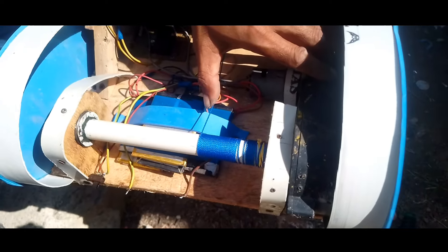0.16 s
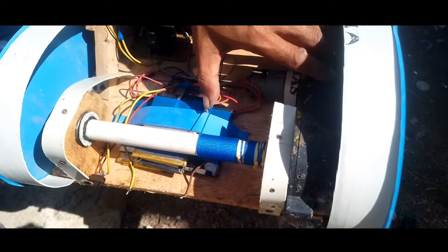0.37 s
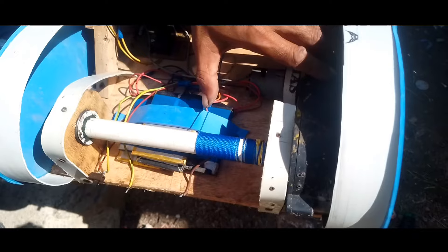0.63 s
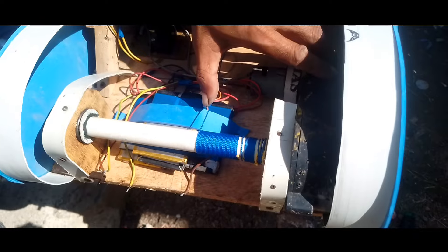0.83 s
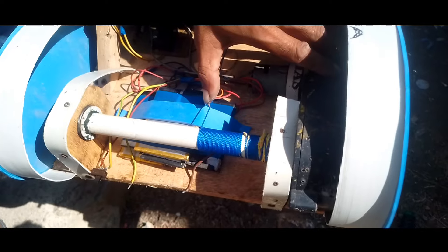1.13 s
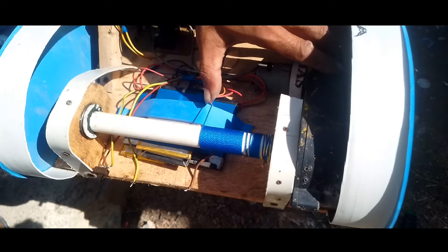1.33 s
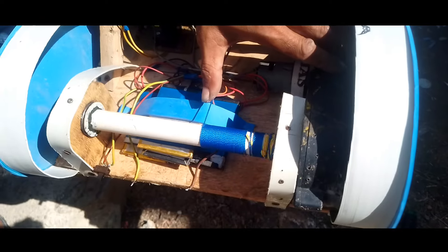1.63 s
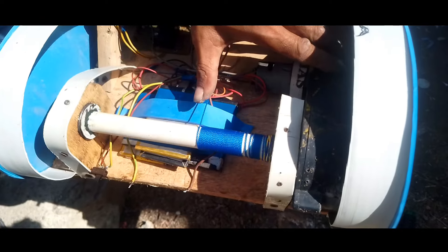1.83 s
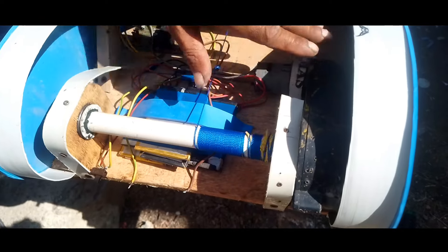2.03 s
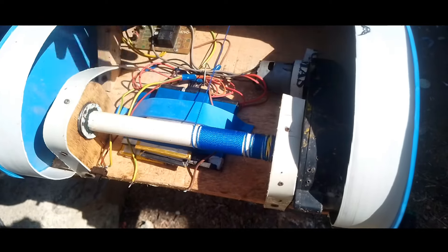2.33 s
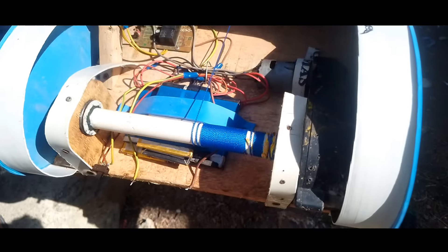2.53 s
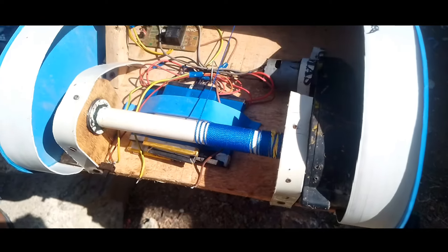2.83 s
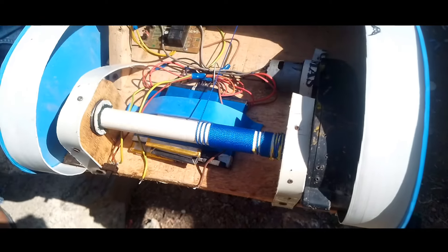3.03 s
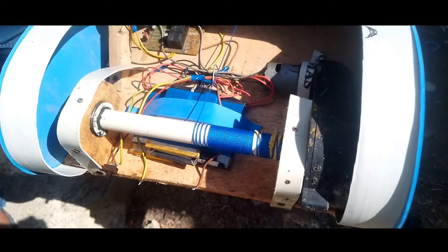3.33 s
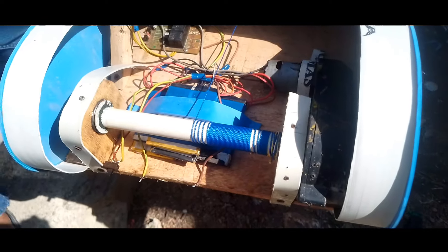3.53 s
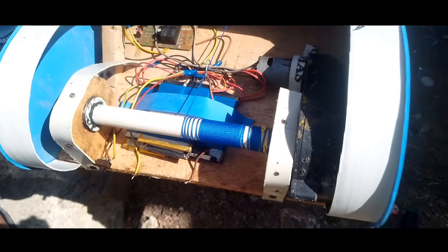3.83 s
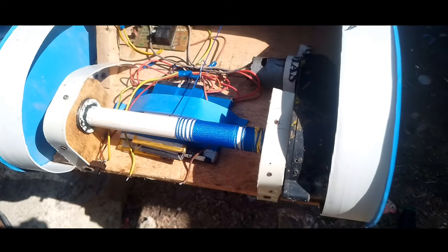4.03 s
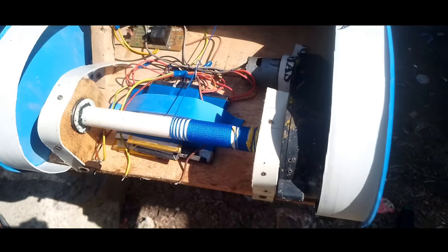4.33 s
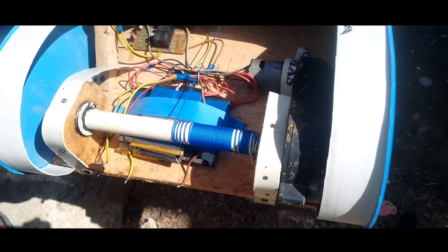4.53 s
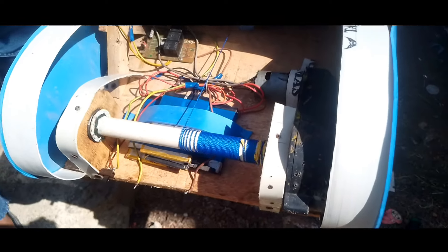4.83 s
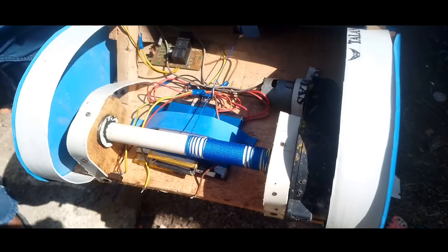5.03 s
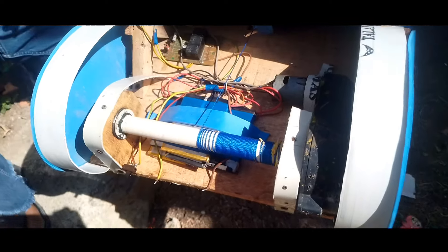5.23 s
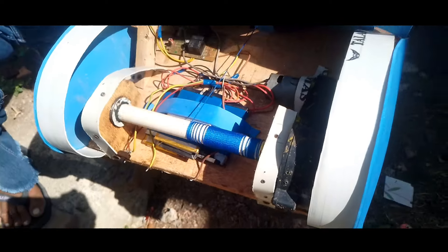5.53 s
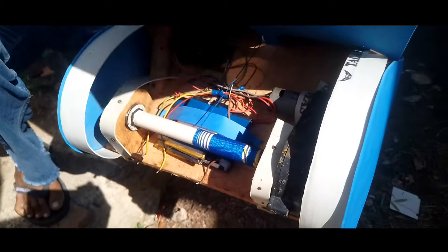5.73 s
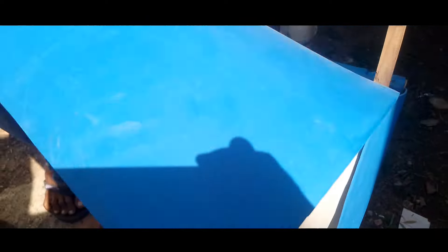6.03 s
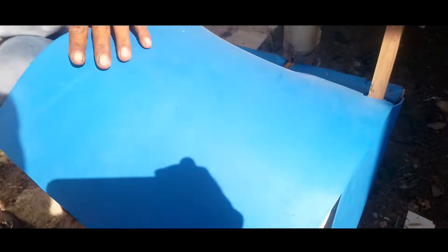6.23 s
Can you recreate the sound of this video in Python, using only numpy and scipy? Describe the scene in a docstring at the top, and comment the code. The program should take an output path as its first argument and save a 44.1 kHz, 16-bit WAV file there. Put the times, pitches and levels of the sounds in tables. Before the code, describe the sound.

From 0 to 3.7 seconds a small brushed gear motor runs very near the stereo microphones in a quiet yard: a steady, nasal electric whine over dry, gritty chatter of gears and brushes, with fine uneven ticks, low rumble and a gentle sway from the turning spool. Around 2 seconds its treble softens as a hand moves away. At 3.7 the current is cut; pitch and rattle slide down to rest within about a quarter second. A hushed pause follows, with very faint brief tones. At 4.19 a tiny bright switch click, stronger on the right, starts it again; the whine climbs rapidly, then eases to full speed by about 5.3, slightly farther away. Near 5.75 a lid swinging over briefly brightens the treble and dulls the hum, then muffles it. At 5.96 the motor is cut and runs down, leaving faint yard noise and a weak, wavering distant buzz until 6.38.

```python
"""A small brushed gear motor winds a spool on a wooden frame outdoors, coasts to a stop, is switched on
and cut again. Rotor and gear mesh sing as sines; chatter of teeth and brushes rings casing modes; teeth tick.
Two microphones hear it differently: a hand shades the motor at first, then they stand further off,
and late on a lid swings down over the motor. Behind it lie a yard of shaped noise, brief faint tones
in the pause, and a far buzz of sines that sets in near the end and remains when the motor rests."""
import sys
import numpy as np
from scipy import signal
from scipy.fft import rfft, irfft
from scipy.io import wavfile

SR = 44100
rng = np.random.default_rng(int(sys.argv[2]) if len(sys.argv) > 2 else 0)


def unload_wav(signal):
    """Save mono or channel-first audio to the path in sys.argv[1] as 16-bit WAV at rate SR, clipped to [-1, 1]."""
    wavfile.write(
        sys.argv[1],
        SR,
        np.round(np.clip(np.atleast_2d(signal).T, -1, 1) * 32767).astype(np.int16),
    )


N = 281358
TIME = np.arange(N) / SR
GEAR = 13 / 70  # turns of the ten-tooth gear per rotor turn


def amp(db):
    """Decibels to gain."""
    return 10 ** (np.asarray(db) / 20)


def rms_one(x):
    """Scale so that the mean of the channels has rms 1."""
    return x / np.sqrt(np.mean(np.atleast_2d(x).mean(axis=0) ** 2) + 1e-20)


def in_time(rows, t=TIME):
    """Columns of a curve table, joined by straight lines over its first column."""
    at, *columns = np.transpose(rows)
    return [np.interp(t, at, column) for column in columns]


def drift(rate_hz, step=8):
    """Slow chance of spread 1: noise twice through a one-pole low-pass."""
    r = np.exp(-2 * np.pi * rate_hz * step / SR)
    noise = rng.standard_normal(N // 8 + 3002)
    slow = signal.lfilter([1], [1, -2 * r, r * r], noise)[3000:]  # skip the filter's start
    return np.interp(np.arange(N) / 8, np.arange(len(slow)), rms_one(slow))


def bump(middle_s, length_s):
    """A soft rise and fall of height 1."""
    return np.exp(-(2 * (TIME - middle_s) / length_s) ** 2)


def resonance(hz, width_hz):
    """One second-order section with gain 1 on top."""
    r = np.exp(-np.pi * width_hz / SR)
    return [(1 - r * r) / 2, 0, (r * r - 1) / 2, 1, -2 * r * np.cos(2 * np.pi * hz / SR), r * r]


def shaped_noise(spectrum, alike):
    """Stereo noise with a given spectrum and left-right likeness; rms 1."""
    hz = np.maximum(np.fft.rfftfreq(N, 1 / SR), 1)
    table_hz, table_db = np.transpose(spectrum)
    gain = amp(np.interp(np.log(hz), np.log(table_hz), table_db))
    mid, side = irfft(rfft(rng.standard_normal((2, N))) * gain, N)
    alike = np.clip(alike, 0, 1)
    return rms_one(np.sqrt(1 + alike) * mid + np.sqrt(1 - alike) * side * np.array([[1], [-1]]))


def tone(hz, db):
    """A steady sine at rms level db, slightly shifted in phase between the microphones."""
    phase = rng.uniform(0, 2 * np.pi) + rng.normal(0, .6, (2, 1))
    return np.sqrt(2) * amp(db) * np.sin(2 * np.pi * hz * TIME + phase)


# the yard all round the microphones: (time [s], level [dB])
YARD_LEVEL = [(0, -65.5), (3.95, -73), (4.02, -69), (4.09, -65), (4.15, -69), (4.3, -67), (6.38, -68)]
# colour of the yard: (frequency [Hz], relative density [dB per Hz])
YARD_SPECTRUM = [(35, -43.5), (60, -13), (159, -15.5), (270, -7.5), (464, -5), (792, -12), (931, -14),
                 (1670, -9), (2150, -3.5), (2980, -13.5), (3760, -9), (5980, -14.5), (6870, 0.5),
                 (12600, -27), (13800, -14.5), (15500, -37.5)]


def yard():
    """Open-air noise from many directions, so the two microphones share little of it."""
    return amp(in_time(YARD_LEVEL)[0] + 1.5 * drift(12)) * shaped_noise(YARD_SPECTRUM, 0.25)


BUZZ_START_S, BUZZ_RISE_S = 6.0, 0.024
# far buzz, partials about 250 Hz apart: (frequency [Hz], level before swells and waver [dB])
BUZZ_PARTIALS = [(748, -86), (995, -78), (1248, -73), (1506, -66.5), (1738, -71.5), (2288, -87),
                 (2495, -73), (3300, -82), (3833, -88), (4081, -81), (4310, -81), (4565, -89), (4791, -89),
                 (5060, -89), (5297, -90), (6304, -86), (6551, -83), (7058, -82), (7300, -69), (7569, -80),
                 (8306, -77), (10094, -78.5)]
# single partials swell: (middle [s], length [s], partial [Hz], gain [dB])
BUZZ_SWELLS = [(6.135, 0.064, 1248, 14), (6.235, .06, 1248, 7), (6.215, 0.08, 1506, 17.5),
               (6.375, 0.063, 1738, 9), (6.035, 0.078, 1738, 32), (6.335, 0.047, 2495, 0),
               (6.205, 0.13, 7300, 20)]


def far_buzz(waver_db=4.5):
    """A buzz from far off: a row of sines that waver and swell one by one."""
    partials = 0
    for hz, db in BUZZ_PARTIALS:
        swell_db = sum(gain_db * bump(middle_s, length_s)
                       for middle_s, length_s, partial_hz, gain_db in BUZZ_SWELLS
                       if abs(partial_hz - hz) < 120)
        partials = partials + tone(hz, db + swell_db + waver_db * drift(26))
    return partials * np.clip((TIME - BUZZ_START_S) / BUZZ_RISE_S, 0, 1)


# faint brief tones in the pause: (middle [s], length [s], frequency [Hz], level at the middle [dB])
BRIEF_TONES = [(3.92, .08, 6200, -72.5), (3.94, .07, 3415, -76.5), (3.94, .08, 8192, -78.5),
               (4.0, .11, 2168, -76), (4.107, .06, 2410, -74), (4.12, 0.09, 1860, -73),
               (4.12, .08, 2164, -76), (4.13, .06, 7665, -75)]


def pause_tones():
    """Faint sines that rise and fall softly while the motor rests or nearly so."""
    return sum(tone(hz, db) * bump(middle_s, length_s) for middle_s, length_s, hz, db in BRIEF_TONES)


# contact snaps shut and bounces: (time [s], relative strength [dB])
CONTACTS = [(4.1911, -10.5), (4.1947, -26), (4.2032, -38)]
# ringing of the switch: (frequency [Hz], relative level [dB], time to fall by 60 dB [s])
CONTACT_MODES = [(4470, -24.5, 0.012), (6500, -20, 0.012), (9900, -8, 0.011), (10440, -11, .01),
                 (14700, -16, .008)]


def switch():
    """The contact snaps shut and bounces; so small a part sends out no bass."""
    clicks, out = np.full(N, 1e-18), 0
    for s, db in CONTACTS:
        clicks[round(s * SR)] = amp(db)
    for hz, db, t60_s in CONTACT_MODES:
        r, w = amp(-60 / (t60_s * SR)), 2 * np.pi * hz / SR
        # a wide resonance softens the onset, then the mode rings
        rising = signal.sosfilt([resonance(hz, 1500)], clicks) * SR / (np.pi * 1500)
        ringing = signal.lfilter([0, np.sin(w)], [1, -2 * r * np.cos(w), r * r], rising)
        out = out + amp(db) * ringing / 8
    return out * amp([[-2.5], [2.5]])  # stronger at the right microphone


# low rumble: (frequency [Hz], relative density [dB per Hz])
RUMBLE_SPECTRUM = [(12, -50), (20, -23), (49, -34.5), (108, -12.5), (150, -20), (260, 2.5), (340, -31.5),
                   (570, -120)]
RUMBLE_DB = -64  # at top speed


def rumble(speed):
    """Low noise, nearly alike at both microphones, in proportion to rotor speed."""
    level = amp(RUMBLE_DB) * speed / max(speed) * amp(3.0 * drift(4))
    return level * shaped_noise(RUMBLE_SPECTRUM, .93)


TICK_SHAFT = .03703  # turns of the next gear per rotor turn
TICK_SCATTER_DB, TICK_FAR_DB = 2.5, -4.5  # chance spread; change with microphones further off
# teeth that tick: (share of the turn [0-1], relative strength [dB])
TICKING_TEETH = [(.17, -13), (.38, -17), (.575, -20), (.775, -20), (.975, -21)]
# ringing of a tick: (frequency [Hz], width of one section [Hz], left level [dB], right level [dB])
TICK_RINGING = [(3660, 700, -8.5, -12), (6870, 870, -1, -25), (8440, 590, -6, -20), (10400, 1200, -11, -3)]


def ticks(speed, rotor, view):
    """Short uneven ticks, once per tooth and turn, weaker at low speed and further off."""
    clicks = np.full(N, 1e-18)
    for share, db in TICKING_TEETH:
        turns = rotor * TICK_SHAFT / (2 * np.pi) - share
        at = np.flatnonzero(np.diff(np.floor(turns)))
        clicks[at] = amp(db + TICK_SCATTER_DB * rng.standard_normal(100)[:len(at)])
    clicks = clicks * (speed / max(speed)) ** 3.0 * amp(TICK_FAR_DB * np.clip(view - 1, 0, 1))
    out = 0
    for hz, width_hz, left_db, right_db in TICK_RINGING:
        peak_one = np.e * SR / (2 * np.pi * width_hz)  # a unit click rings up to about 1
        ringing = signal.sosfilt([resonance(hz, width_hz)] * 2, clicks) * peak_one
        out = out + amp([[left_db], [right_db]]) * ringing
    return out


# casing and frame modes: (frequency [Hz], width of one section [Hz], then relative left and right
# level [dB] in each of the three views, left-right likeness [0-1], right lag [ms])
CASING_MODES = [(282, 91, -30, -30, -28.5, -26, -29, -29.5, 0.99, 0.046),
                (344.6, 108, -27, -26, -22, -22.5, -23.5, -26, 1, -0.1),
                (467, 68, -24.5, -27, -13, -15.5, -15, -14.5, 1, 0.03),
                (528.3, 193, -11, -11, -11.5, -10, -11.5, -9, 0.99, -0.051),
                (624, 88, -15, -16, -12.5, -13, -11, -11.5, 1, -0.34),
                (861, 140, -10, -15.5, -8, -13, -8.5, -10.5, 0.9, -0.038),
                (957, 82, -19, -14.5, -23.5, -17.5, -13.5, -20.5, 0.94, 0.028),
                (1087, 150, -23, -28, -22, -30.5, -24.5, -27, 0.9, 0),
                (1242, 177, -12.5, -17.5, -10.5, -14, -9.5, -13.5, 0.73, -0.11),
                (1433, 290, -24.5, -23.5, -23, -22.5, -21.5, -20, 0.4, 0.2),
                (1614, 310, -18, -18, -16.5, -17.5, -16, -16, 0.38, 0.1),
                (2044, 310, -19.5, -16, -22, -14, -18, -11, 0.31, 0.039),
                (2390, 240, -23, -19.5, -30.5, -17, -20, -15.5, 0.22, 0.00044),
                (2950, 435, -11.5, -13.5, -10.5, -14, -10, -12.5, 0.67, 0.13),
                (3348, 320, -16.5, -22.5, -19.5, -24.5, -12.5, -27.5, 0.32, 0.08),
                (3680, 510, -19.5, -22, -14, -16.5, -16.5, -14, 0.97, 0.0029),
                (3996, 430, -14, -17.5, -15, -16.5, -16.5, -22, 0.23, 0.016),
                (4435, 590, -18.5, -45, -18.5, -45.5, -17, -22, 0.18, 0.045),
                (5090, 560, -19, -36.5, -18.5, -31, -18, -48, 0.21, 0.016),
                (5570, 600, -16, -31.5, -17, -50, -15.5, -36, 0.11, -0.067),
                (6237, 470, -16, -22.5, -14.5, -24, -13, -21, 0.34, -0.067),
                (7020, 830, -14.5, -48.5, -12.5, -50, -14.5, -31, 0.09, -0.013),
                (7990, 790, -12, -30, -12.5, -30.5, -11, -21.5, 0.22, -0.16),
                (8500, 360, -21, -15, -23, -25, -14.5, -21.5, 0.41, -0.012),
                (9385, 590, -18, -11, -14, -10, -11.5, -6, 0.43, 0.055),
                (9994, 510, -16.5, -4.5, -17.5, -5.5, -12.5, -5.5, 0.21, -0.016),
                (10530, 570, -27, -10, -27.5, -4.5, -25, -6, 0.27, 0.14),
                (10820, 400, -25, -30, -23.5, -30, -18.5, -29, 0.1, 0),
                (11160, 940, -34.5, -23, -42.5, -16, -27, -15, 0.16, 0.077),
                (12300, 840, -23, -22.5, -21.5, -20, -17, -17.5, 0.21, 0.035),
                (13200, 750, -27.5, -37, -21.5, -32, -27, -26, 0.18, -0.035),
                (14060, 500, -28, -55, -23.5, -56.5, -22, -50, 0.02, 0.013),
                (14700, 700, -27.5, -55, -22, -55, -19.5, -39, 0.02, 0.013),
                (15500, 910, -21.5, -48.5, -18.5, -47.5, -19, -28, 0.04, -0.03)]
# borders between hum, casing and treble: [Hz]
GROUP_BORDERS = [1500, 8800]
WORN = .4  # weight of the chatter that repeats with every turn of the gear
LUMP_HZ = 304  # rate at which the chatter clumps


def view_db(mode, view):
    """Left and right level of a mode as the view changes."""
    return np.array([np.interp(view, [0, 1, 2], mode[2 + side:8:2]) for side in (0, 1)])


def rattle(rotor, view, rotor_db=1.5, lumps_db=2.0, patchy_db=1.0):
    """Brush and tooth chatter, throbbing with rotor and gear, rings every mode; one sum per group."""
    gear = rotor * GEAR
    throb_db = rotor_db * np.cos(rotor) + 0.52 * np.cos(rotor * .036)  # rotor and slow output shaft
    throb_db = throb_db + .4 * np.cos(gear) + .8 * np.cos(2 * gear) + .8 * np.cos(3 * gear)
    spot = (gear / (2 * np.pi) % 1 * 700).astype(int)  # worn spots round the gear knock on every turn
    chatter = []
    for _ in range(4):
        level = amp(throb_db + lumps_db * drift(LUMP_HZ))
        repeating = rng.standard_normal((2, 700))[:, spot]
        loose = rng.standard_normal((2, N))
        chatter.append(level * (WORN * repeating + np.sqrt(1 - WORN ** 2) * loose))
    patches = [drift(13.0) for _ in range(6)]
    groups = np.zeros((3, 2, N))
    for k, mode in enumerate(CASING_MODES):
        hz, width_hz, alike, lag_ms = mode[0], mode[1], np.clip(mode[8], 0, 1), mode[9]
        source = rms_one(chatter[k % 4]) / np.sqrt(2)
        left, own = signal.sosfilt([resonance(hz, width_hz)] * 2, source)
        late = np.interp(TIME - lag_ms / 1000, TIME, left)
        pair = [left, alike * late + np.sqrt(1 - alike ** 2) * own]
        level = amp(view_db(mode, view) + patchy_db * patches[k % 6])
        groups[np.searchsorted(GROUP_BORDERS, hz)] += level * pair
    return groups


# sung lines: (rotor multiple, gear multiple, relative left and right level before the casing [dB],
# right lag [rad])
SUNG_ORDERS = [(1, 0, -24, -20, 0.12), (0, 10, -13, -16.5, 0.5), (0, 9, -33, -32, 1),
               (-1, 10, -40, -35, 1.5), (2, 0, -44, -25.5, -0.5), (0, 15, -41.5, -42, 0.5),
               (3, 0, -26.5, -30.5, -0.5), (0, 30, -47, -46, -2.5), (0, 20, -35.5, -22, 4.5),
               (5, 0, -39.5, -26.5, -0.3), (6, 0, -24.5, -20, 1.5), (9, 0, -28, -26, -0.5),
               (10, 0, -19, -24.5, 1.5), (11, 0, -26, -28.5, -2), (10, 10, -27.5, -30, -1),
               (12, 0, -19.5, -20, -1), (11, 10, -33, -41, 3), (15, 0, -16, -15.5, -0.3),
               (16, 0, -33.5, -36.5, 3.5), (18, 0, -27, -33, -5), (19, -1, -26, -33.5, -2),
               (20, 0, -35.5, -33.5, 3.1), (21, 0, -26.5, -39, 6), (24, 0, -35.5, -36, 2.5),
               (30, -1, -36, -27.5, 5.5), (30, 0, -41, -33, -1), (31, 0, -34, -29, -2),
               (31, 1, -36, -31, 0.2), (34, 0, -42, -31, 6.5)]
# some brush lines change once the microphones are further off: {rotor multiple: change [dB]}
FAR_LINES = {11: -1, 12: -1, 15: -4, 16: 5, 18: 8, 21: 6}
BLUR_DB = 24  # loss of the rotor tone and high brush lines at standstill


def whine(speed, rotor, view, first_db, second_db, mesh_waver_db=.8, brush_waver_db=1.88):
    """Each order is a sine on the exact speed; it swells as it glides through the casing modes."""
    groups, coarse = np.zeros((3, 2, N)), np.arange(0, N, 256)
    powers = [amp(2 * view_db(mode, view[coarse])) for mode in CASING_MODES]
    wavers = [drift(18.4)[coarse] for _ in range(8)]
    for k, (turns, gear_turns, left_db, right_db, lag) in enumerate(SUNG_ORDERS):
        multiple = round(turns) + round(gear_turns) * GEAR
        hz = np.maximum(multiple * speed[coarse], 1)
        power = sum(p / (1 + ((hz - mode[0] ** 2 / hz) / mode[1]) ** 2) ** 2
                    for p, mode in zip(powers, CASING_MODES))
        waver_db = brush_waver_db if round(turns) else mesh_waver_db
        db = waver_db * wavers[k % 8] + np.array([[left_db], [right_db]])
        if round(gear_turns) in (15, 30):  # second mesh
            db = db + second_db[coarse]
        elif round(turns) == 0:  # first mesh
            db = db + first_db[coarse]
        elif round(turns) >= 9 or multiple == 1:
            # the rotor tone and the high brush lines only stand clear near full speed
            db = db - BLUR_DB * (1 - speed[coarse] / max(speed))
            db = db + FAR_LINES.get(round(turns), 0) * np.clip(view[coarse] - 1, 0, 1)
        gains = np.sqrt(2 * power) * amp(db)
        level = np.array([np.interp(np.arange(N), coarse, gain) for gain in gains])
        line = np.sin(multiple * rotor + rng.uniform(0, 2 * np.pi) - np.array([[0], [lag]]))
        groups[np.searchsorted(GROUP_BORDERS, multiple * max(speed))] += level * line
    return groups


# speed in each of the three views, before the spool rocks it: [rotor turns per s]
VIEW_SPEEDS = [334, 339.4, 339.6]
# gathering speed: (time after switching on [s], share of full speed [0-1])
RUN_UP = [(0, 0), (.06, .454), (.11, .607), (.17, .725), (.22, .785), (.28, .822), (.41, .857), (.49, .892),
          (.57, .913), (.65, .934), (.81, .966), (.97, .988), (1.05, .995), (1.15, 1)]
# current cut, the switch closes again in between: (time [s], time constant of coasting [s])
CURRENT_CUTS = [(3.702, .125), (5.961, .11)]
# the uneven spool rocks the speed: (depth at full speed [turns per s], lead [rad])
SPOOL_ROCKING = (1.0, 1.7)
SPOOL = 1 / 148.2  # spool turns per rotor turn
FRICTION = 60  # turns per s that dry friction takes on top


def rotor_speed(view):
    """Speed rocked by the spool, a spin-up after the switch, a coast to rest after each cut.
    Also returns the spool angle and whether current flows."""
    on_s = CONTACTS[0][0]
    cut_s, coast_s = [np.where(TIME < on_s, *column) for column in np.transpose(CURRENT_CUTS)]
    driven = TIME < cut_s
    gathered = np.where(TIME < on_s, 1, in_time(RUN_UP, TIME - on_s)[0])
    full = np.interp(view, range(3), VIEW_SPEEDS) * gathered
    coast = (full + FRICTION) * np.exp(-np.maximum(TIME - cut_s, 0) / coast_s) - FRICTION
    speed = np.maximum(coast, 0)
    spool = 2 * np.pi * SPOOL * np.cumsum(speed) / SR
    depth, lead = SPOOL_ROCKING
    return speed * (1 + depth / max(VIEW_SPEEDS) * np.cos(spool + lead)), spool, driven


# place of the microphones: (time [s], view: 0 hand over the motor, 1 hand away, 2 further off)
MICROPHONE_VIEW = [(0, 0), (1.9, 0), (2.1, 1), (3.9, 1), (4.2, 2), (6.38, 2)]
# base level in each of the three views: (hum [dB], casing [dB], treble [dB], first mesh over its order [dB])
VIEW_LEVELS = [(-25, -24.5, -19.5, 1.5), (-27, -26, -23.5, 0), (-28, -27.5, -25.5, 0)]
# change of level with speed under current:
# (speed [turns per s], hum [dB], casing [dB], treble [dB], first mesh [dB], second mesh [dB])
DRIVEN_LEVELS = [(0, -41, -45, -53, -14, 0), (40, -20, -25, -29, -14, 0), (77, -11.5, -14.5, -20, -13, 0),
                 (128, -8, -8, -14, -16.5, 18), (170, -10.5, -5, -8, -13, 25.5),
                 (206, -2.5, 0.5, -2, -5.5, 24), (235, 1, 3, 1.5, -10.5, 26),
                 (244, -0.5, 1.5, -1, 6.5, -0.5), (262, 1, 1.5, -2.5, -1, 0.5), (298, 0.5, 0, 0.5, 0, 3)]
# the same with the current cut:
# (speed [turns per s], hum [dB], casing [dB], treble [dB], first mesh [dB], second mesh [dB])
COASTING_LEVELS = [(0, -47, -47, -55, -12, 0), (20, -34, -43, -53, -12, 0), (45.2, -15, -25.5, -43, -14, 0),
                   (65, -12, -23.5, -34, -14, 0.5), (95, -9.5, -17, -27, -14, 3),
                   (140, -8.5, -10, -19, -11, 24), (195, -3.5, -5.5, -9, -11.5, 29),
                   (238, -4, -2, -7, -4, 31.5), (280, -3, -1.5, -2, 0.5, 25.5), (325, 2, -3.5, -5, -1, 8)]
# the spool rocks hum, casing, treble and first mesh, one row each: (depth [dB], lead [rad])
SPOOL_LEVELS = [(0.77, -0.4), (0.74, -1), (0.2, -1), (1.4, -2.5)]
# a lid swings down over the motor: (time [s], hum [dB], casing [dB], treble [dB])
LID_LEVELS = [(5.5, -1.5, -1.5, -1.5), (5.7, -2.5, -2.5, -1), (5.74, -3.5, -0.5, 3.5),
              (5.82, -3.5, -0.5, 4), (5.92, -4, -3.5, -1.5), (6.02, -2, -3, -4), (6.06, -4, -4, -5)]


def motor():
    """Rattle and whine follow view, speed, spool and lid in level; rumble and ticks join them."""
    view, = in_time(MICROPHONE_VIEW)
    speed, spool, driven = rotor_speed(view)
    by_speed = np.where(driven, in_time(DRIVEN_LEVELS, speed), in_time(COASTING_LEVELS, speed))
    *by_speed, second_db = by_speed
    *levels, first_db = [
        np.interp(view, range(3), steady_db) + change_db + depth_db * np.cos(spool + lead)
        for steady_db, change_db, (depth_db, lead)
        in zip(np.transpose(VIEW_LEVELS), by_speed, SPOOL_LEVELS)]
    rotor = 2 * np.pi * np.cumsum(speed) / SR
    groups = rattle(rotor, view) + whine(speed, rotor, view, first_db, second_db)
    body = sum(amp(db + lid_db) * rms_one(group)
               for db, lid_db, group in zip(levels, in_time(LID_LEVELS), groups))
    return body + rumble(speed) + ticks(speed, rotor, view)


def scene():
    """Yard, far buzz, brief tones, switch and motor."""
    return yard() + far_buzz() + pause_tones() + switch() + motor()


CUTOFF_HZ = 15480


def record(dry):
    """The top is cut steeply at both microphones."""
    low_pass = signal.ellip(12, .3, 70, CUTOFF_HZ, fs=SR, output="sos")
    return signal.sosfilt(low_pass, dry)


dry = scene()
out = record(dry)
unload_wav(out)
```